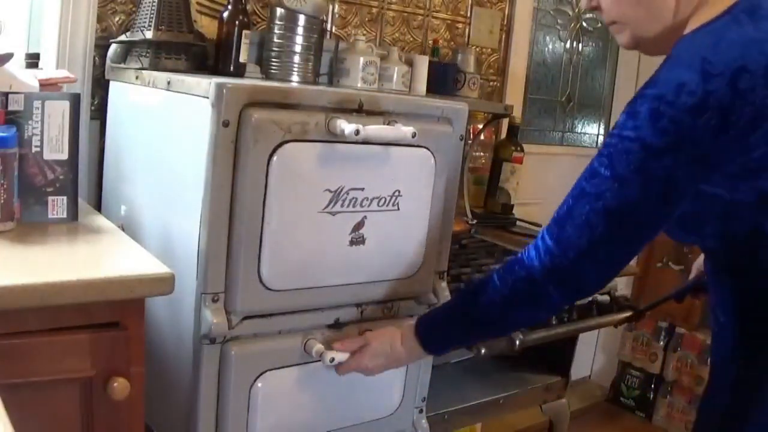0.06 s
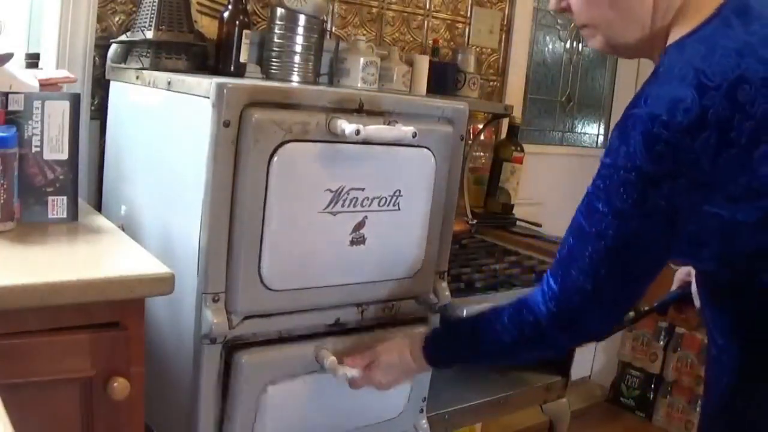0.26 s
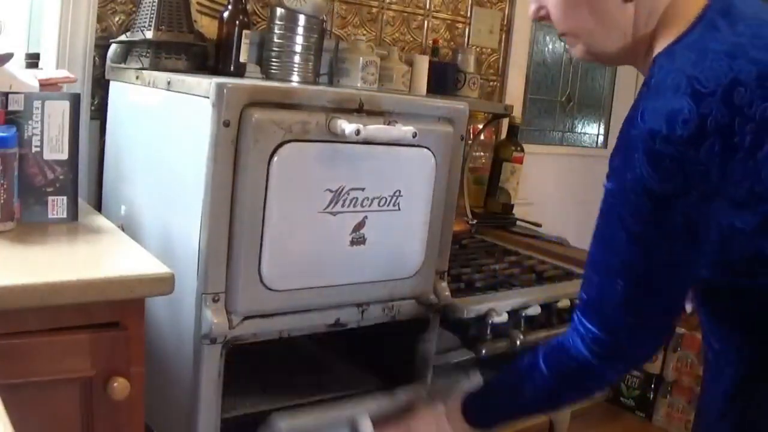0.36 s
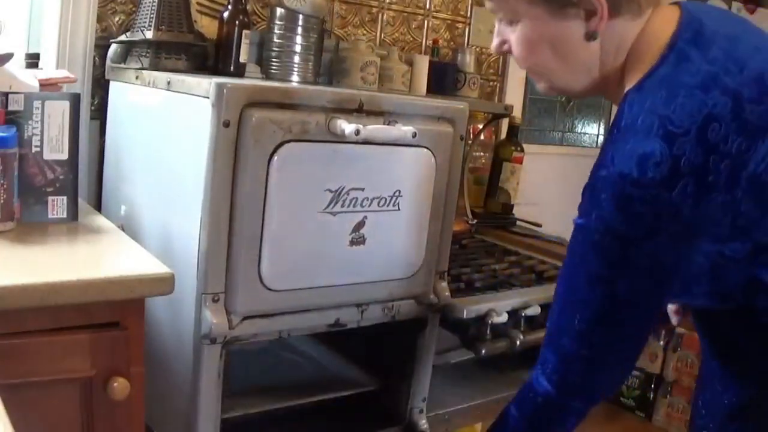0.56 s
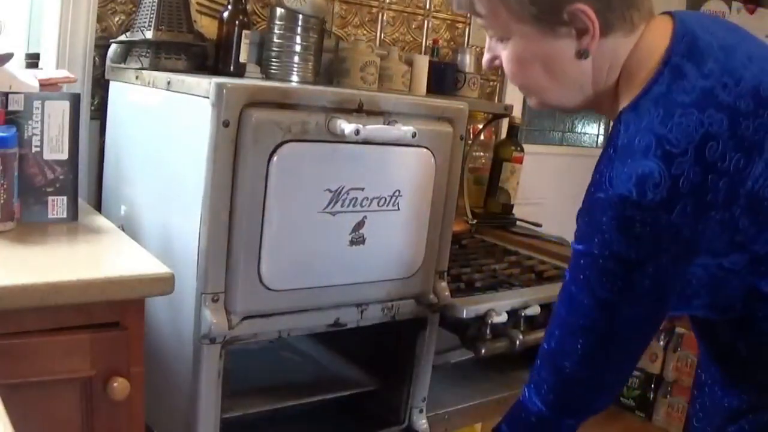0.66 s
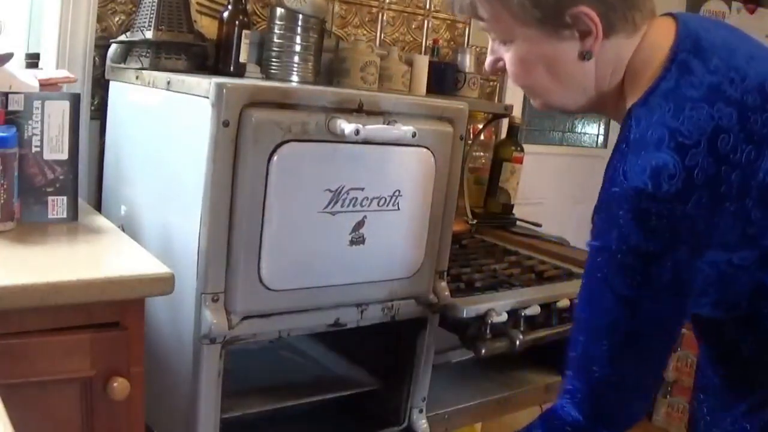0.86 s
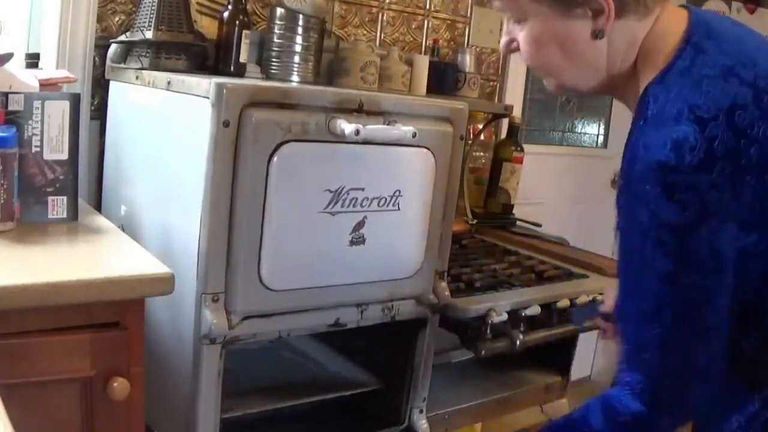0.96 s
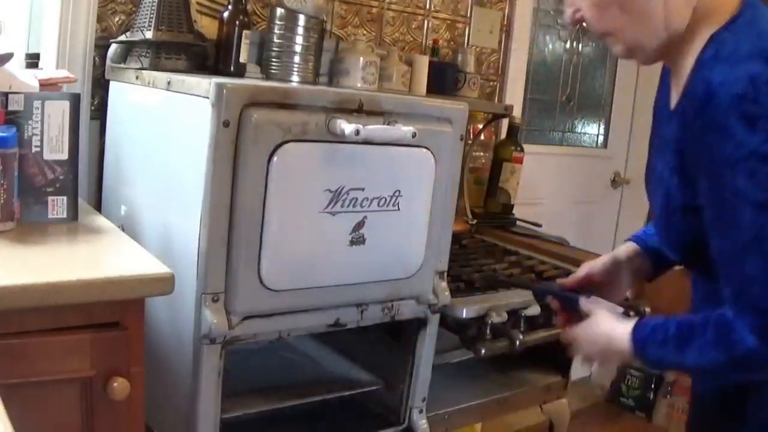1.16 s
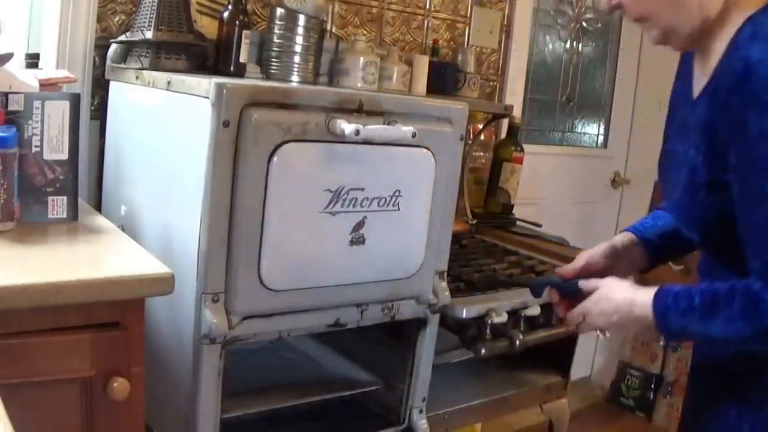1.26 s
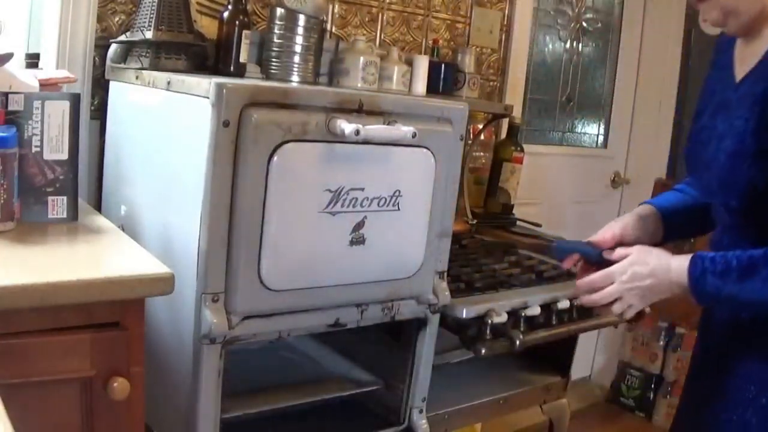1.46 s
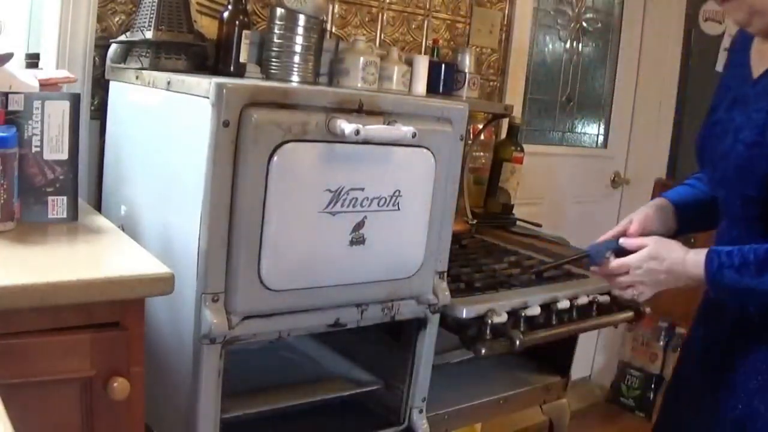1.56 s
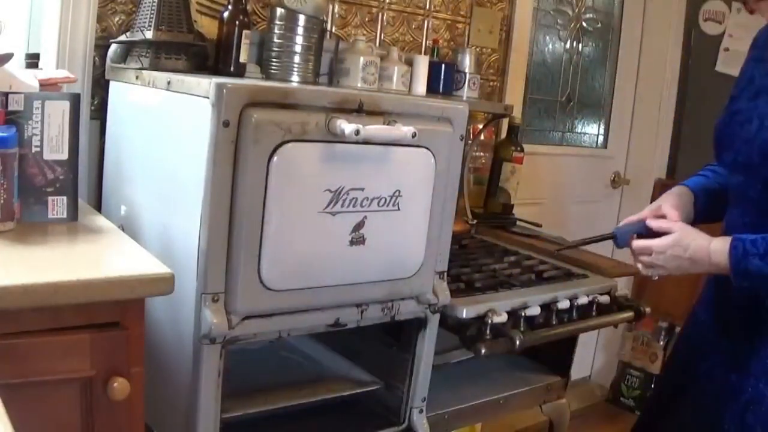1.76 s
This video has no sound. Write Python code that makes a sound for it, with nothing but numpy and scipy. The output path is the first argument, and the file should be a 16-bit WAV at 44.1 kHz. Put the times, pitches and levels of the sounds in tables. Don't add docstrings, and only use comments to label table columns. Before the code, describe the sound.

A heavy metal oven door snaps open with a scraping clatter, then a loose tray rattles

```python
import sys
import numpy as np
from scipy import signal
from scipy.fft import rfft, irfft, next_fast_len
from scipy.io import wavfile
from scipy.ndimage import uniform_filter1d, map_coordinates

SR = 44100
rng = np.random.default_rng(int(sys.argv[2]) if len(sys.argv) > 2 else 0)


def attenuation_scalar(level_db):
    decades = np.asarray(level_db, float) / 20
    return 10 ** decades


def transcribe(signal):
    frames = np.atleast_2d(signal).T
    limited = np.clip(frames, -1, 1)
    pcm = np.round(limited * 32767).astype(np.int16)
    wavfile.write(sys.argv[1], SR, pcm)


N = 79380

# freq_hz, density_db_per_hz
FLOOR_SPECTRUM = [(15, -28), (25, 1.5), (64, 0.5), (572, -11.5), (649, -9), (719, -12), (1470, -16.5),
                  (3950, -20), (10900, -21.5), (14200, -67), (22000, -120)]
FLOOR_DB = -57
HUM_HZ, HUM_DB = 48.8, -59

# start_s, peak_db, t60_s, box_boom_db
BUMPS = [(.085, -54.5, 4.7, -9), (.207, -30, 0.19, -5.5), (0.272, -39, 1.7, -2.5), (0.418, -38, 0.7, -9.5),
         (0.604, -33.5, 0.2, -14), (.657, -46, 0.059, -17), (0.71, -48.5, 0.17, 8), (.852, -45, 0.34, -15),
         (0.888, -29, 0.22, -7), (0.946, -29.5, 0.22, -7), (1.038, -35.5, 0.52, -1),
         (1.199, -45.5, 0.84, -2)]
# freq_hz, width_hz, level_db
PANEL_MODES = [(274, 41, -4), (326, 47.6, 1), (397, 93, -1.5), (448, 92, -2.5), (723, 280, -12)]
# freq_hz, width_hz, level_db
BOX_MODES = [
    (101.7, 14, 0.5),
    (140.7, 32, -1.5),
    (199.5, 33, -8.5),
]
# centre_s, level_db
SWAYS = [
    (.95, -36),
    (1.08, -48),
    (1.25, -49),
]
SWAY_S, SWAY_HZ = 0.031, 29.74

# start_s, peak_db, t60_s, tilt_db_per_octave, rise_ms
TICKS = [(0.1027, -40.5, 0.43, -3.5, 1.7), (0.187, -41, 0.073, 0, 0.43), (0.2052, -7.5, 0.0072, 1.5, 0.13),
         (0.2056, -20.5, 0.13, 1, .3), (.2352, -19, .006, 1, .1), (.2403, -19, 0.0066, 4, .1),
         (.2585, -19, 0.0036, 4, 0.084), (.278, -12, 0.0044, -4, .1), (0.2846, -16, .004, 8, .1),
         (.298, -11, 0.0044, 4, .1), (.3145, -7, 0.0047, -1, .1), (0.2523, -23, 0.29, 5.5, 2),
         (0.499, -42, 3, -7.5, 16.6), (.603, -39.5, 0.3, -10, 18), (.645, -53.5, 0.25, -16.5, 3),
         (0.7114, -35, 0.31, -7, 3), (.75, -47.5, 0.35, -10.5, 2.4), (0.8681, -28, 0.11, -9.5, 1.2),
         (0.8854, -25.5, 0.017, 4, .2), (0.8858, -23.5, 0.1, -10, 0.9), (.955, -27, 0.16, -5, 2.6),
         (1.018, -19.5, 0.13, -3, 5.6), (1.101, -15, 0.16, -2.5, 6.5), (1.13, -26, 0.21, -7, 6.2),
         (1.168, -22.5, 0.16, -0.5, 6.5), (1.208, -19.5, 0.19, -2, 9.8), (1.298, -28, 0.085, 1.5, 3.3),
         (1.372, -30.5, 0.089, 2, 3.84), (1.638, -29, 0.25, -4.5, 5)]

# time_s, force_db
CATCH_FORCE = [
    (.2045, -62),
    (.206, -17.5),
    (.222, -24),
    (.244, -25.5),
    (.256, -20),
    (.275, -24),
    (.31, -53),
]
# freq_hz, width_hz, level_db
CATCH_MODES = [(353, 30, -2.5), (1200, 52, -1.5), (1440, 200, -10.5), (1824, 59, 1.5), (2050, 100, -4.5),
               (2236, 43, 2), (2380, 39.3, -16), (3130, 99, -2.5), (6360, 270, -6)]
# freq_hz, density_db_per_hz
CATCH_GRIT = [(41, -52), (70, -49), (342, -33), (1070, -21.5), (1810, 3.5), (2600, -10), (4600, -18),
              (6450, -27), (10900, -27), (14200, -61), (22000, -120)]
# time_s, force_db
HINGE_FORCE = [
    (.25, -60),
    (.254, -33.5),
    (.285, -18),
    (.335, -20),
    (.36, -24.5),
    (.4, -31),
    (.52, -53.5),
]
# freq_hz, width_hz, level_db
DOOR_MODES = [(270, 45, 0), (720, 160, -3.5), (1400, 210, -8), (2006, 235, 6), (2184, 91, 2.5),
              (2680, 94, 7), (2970, 120, 0.5), (3620, 42, 9.5), (6040, 233, -3.5), (6790, 250, 3.5),
              (9760, 410, -11), (10100, 750, -17)]
# freq_hz, density_db_per_hz
HINGE_GRIT = [(41, -52), (70, -36), (177, -34), (271, -12), (556, -17.5), (716, -7.5), (1120, -16.5),
              (2150, -10.5), (10900, -26.5), (14200, -53.5), (22000, -120)]

# start_s, length_s, pitch_hz, level_db
SQUEAKS = [(0.21, 0.016, 1815, -17.5), (.2055, 0.019, 6900, -29), (0.22, 0.016, 2060, -31),
           (.242, 0.013, 1850, -24), (.26, .016, 1745, -23), (.292, .012, 1000, -25),
           (0.274, .03, 2000, -27), (0.25, 0.061, 6900, -27), (.212, 0.028, 340, -30),
           (0.265, 0.05, 276, -26.5), (0.26, 0.017, 600, -29), (0.33, 0.032, 2670, -22.5),
           (0.34, 0.03, 2110, -24.5), (0.321, 0.042, 728, -22.5), (0.33, 0.013, 820, -32),
           (0.7, 0.08, 337.1, -44), (.85, .026, 395, -37), (0.886, 0.012, 599.2, -30),
           (1, 0.011, 1470, -26), (0.892, 0.0089, 345, -23), (.911, 0.016, 385, -24),
           (.946, 0.0039, 400, -20), (.956, 0.018, 365, -26), (.9145, 0.013, 8560, -23.5),
           (.929, 0.0092, 9300, -27.5), (0.87, 0.012, 5710, -43), (0.97, 0.018, 8610, -35),
           (1.08, 0.056, 6770, -32.5), (1.35, 0.0093, 9200, -34), (1.23, 0.0093, 7600, -33),
           (1.4, .01, 10100, -40.5), (1.44, 0.016, 7200, -42)]
SQUEAK_WET = 0.45

# time_s, force_db, weight_db, edge_contact_db
DRAG = [(.885, -43, 1, 4), (.892, -29.5, 0.5, -2), (.94, -38.5, 7, 0.5), (.97, -30, 0.5, -2.5),
        (1.014, -30.5, -1.5, -3), (1.05, -33.5, 1, -1.5), (1.1, -28.5, -2.5, -5.5), (1.16, -29, -2.5, -1.5),
        (1.198, -31, -0.5, -1), (1.242, -28, 0, -5.5), (1.29, -33.5, -2.5, -2), (1.35, -37, 3.5, -4.5),
        (1.41, -35, 2, -8), (1.46, -34.5, -3, -4), (1.55, -36.5, 1, -7), (1.625, -40.5, 2.5, -9),
        (1.7, -38.5, 3.5, -9), (1.8, -41.5, 0.5, -6.5)]
# freq_hz, width_hz, level_db
TRAY_MODES = [(368, 78, 6), (714, 27, 1), (840, 24.5, -11), (1027, 21, -13), (1720, 480, 1),
              (2705, 220, 13.5), (3080, 480, -5), (5840, 90, -29), (6700, 170, -20), (8510, 84, 1),
              (9890, 120, -3)]
# freq_hz, density_db_per_hz
TRAY_GRIT = [(110, -27), (180, -11.5), (845, 2), (1460, -6), (2720, -4), (7120, -14), (8750, -9),
             (10900, -20), (14200, -70), (22000, -120)]
# freq_hz, share
TRAY_SPLITS = [
    [(900, 1), (1600, 0.089)],
    [(4500, 0.039), (6500, 0.93)],
]

# freq_hz, t60_s
KITCHEN_T60 = [(100, 0.39), (500, 0.64), (2500, 0.46), (9000, 0.18)]
KITCHEN_DB = -4.5

CEILING, TOP_HZ = 0.62, 11100


def unit(x):
    return x / np.sqrt(np.mean(x ** 2) + 1e-20)


def along(points, hz):
    f, v = np.transpose(points)
    return np.interp(np.log(hz + 1), np.log(f + 1), v)


def curves(rows):
    s, *cols = np.transpose(rows)
    return [np.interp(np.arange(N) / SR, s, c, left=-120) for c in cols]


def wobble(rate_hz):
    knots = rng.standard_normal(int(N * rate_hz / SR) + 4)
    return map_coordinates(knots, [np.arange(N) * rate_hz / SR])


def filtered(x, response):
    m = next_fast_len(N + SR // 2)
    return irfft(rfft(x, m) * response(np.fft.rfftfreq(m, 1 / SR)), m)[..., :N]


def modes(body):
    def response(f):
        total = 0
        for k, (hz, width_hz, db) in enumerate(body):
            damping = 1j * f * width_hz
            total = total + (-1) ** k * attenuation_scalar(db) * damping / (hz * hz - f * f + damping)
        return total
    return response


def grit(spectrum, excite):
    return unit(filtered(excite, lambda f: attenuation_scalar(along(spectrum, f))))


def slips(rate_hz, spread_db, lumpy_db):
    hit = rng.random(N) < rate_hz / SR
    size = attenuation_scalar(spread_db * rng.exponential(size=N)) * rng.standard_normal(N)
    return unit(hit * size * attenuation_scalar(lumpy_db * wobble(90)))


def rub(force_db, body, spectrum, ring_db, excite):
    response = modes(body)
    ring = filtered(attenuation_scalar(force_db) * excite, response) / np.std(filtered(excite, response))
    return attenuation_scalar(force_db) * grit(spectrum, excite) + attenuation_scalar(ring_db) * ring


def stroke(points):
    return np.where(np.arange(N) > points[-1][0] * SR, -120, curves(points)[0])


def floor():
    mid, side = (grit(FLOOR_SPECTRUM, rng.standard_normal(N)) for _ in range(2))
    side = filtered(side, lambda f: 0.5 * f / (f + 150))
    hum = attenuation_scalar(HUM_DB + wobble(8.3)) * np.sin(2 * np.pi * HUM_HZ * np.arange(N) / SR)
    return attenuation_scalar(FLOOR_DB) * np.array([mid + side, mid - side]) + hum


def sways():
    t = np.arange(N) / SR
    push = sum(attenuation_scalar(db) * np.exp(-((t - s) / SWAY_S) ** 2) for s, db in SWAYS)
    pitch_hz = SWAY_HZ * (1 + 0.16 * wobble(11.6))
    return push * np.sin(2 * np.pi * np.cumsum(pitch_hz) / SR)


def bumps():
    t = np.arange(N) / SR
    force = []
    for s, db, t60_s, _ in BUMPS:
        decay = attenuation_scalar(db - 60 * np.clip(t - s, 0, None) / t60_s)
        force.append(decay * np.clip((t - s) / 0.0049, 0, 1))
    force = np.array(force)
    boom = attenuation_scalar(np.transpose(BUMPS)[-1])
    out = 0
    for body, share in (PANEL_MODES, np.ones(len(BUMPS))), (BOX_MODES, boom):
        noise = rng.standard_normal(N)
        steep = lambda f: modes(body)(f) / (1 + 1j * f / (4.0 * body[0][0])) ** 2
        out = out + filtered(share @ force * noise, steep) / np.std(filtered(noise, steep))
    return out


def ticks():
    out, t = np.zeros(N + SR), np.arange(SR // 2) / SR
    f = np.fft.rfftfreq(len(t), 1 / SR)
    highpass = 1j * f / (900 + 1j * f)
    for s, db, t60_s, tilt_db, rise_ms in TICKS:
        rise = np.minimum(t * 1000 / rise_ms, 1)
        burst = attenuation_scalar(db - 60 * t / t60_s) * rise * rng.standard_normal(len(t))
        tilt = attenuation_scalar(tilt_db * np.log2(f / 4000 + 0.18))
        out[round(s * SR):][:len(t)] += irfft(rfft(burst) * tilt * highpass, len(t))
    return out[:N]


def catch():
    return rub(stroke(CATCH_FORCE), CATCH_MODES, CATCH_GRIT, -0.7, slips(15000, 0.43, 1.65))


def hinge():
    return rub(stroke(HINGE_FORCE), DOOR_MODES, HINGE_GRIT, -1.3, slips(15000, 2.0, 0.89))


def squeaks():
    t, out = np.arange(N) / SR, 0
    for s, length_s, hz, db in SQUEAKS:
        u = np.clip((t - s) / length_s, 0, None)
        rough_hz = 620 * hz / 8000
        flutter = attenuation_scalar(1.5 * wobble(rough_hz / 2)) * np.exp(1j * wobble(rough_hz))
        swell = 2 * np.sqrt(u) * np.exp(-u ** 3)
        out = out + attenuation_scalar(db) * swell * np.real(flutter * np.exp(2j * np.pi * hz * t))
    return out


def patchy(x, depth_db):
    z = signal.stft(x, nperseg=512)[2]
    field = uniform_filter1d(rng.standard_normal(z.shape), size=4, axis=0)
    field = uniform_filter1d(field, size=8, axis=1)
    return signal.istft(z * attenuation_scalar(depth_db * unit(field)), nperseg=512)[1][:N]


def tray():
    force_db, weight_db, edge_db = curves(DRAG)
    excite = slips(16000, 0.85, 1.0)
    rattle = patchy(rub(np.zeros(N), TRAY_MODES, TRAY_GRIT, -5, excite), 1.3)
    low, high = (filtered(rattle, lambda f: np.clip(along(p, f), 0, 1)) for p in TRAY_SPLITS)
    parts = unit(rattle - low - high)
    parts = parts + attenuation_scalar(weight_db + wobble(25.62)) * unit(low)
    parts = parts + attenuation_scalar(edge_db + 1.2 * wobble(30.36)) * unit(high)
    return attenuation_scalar(force_db - 2.0 + 0.42 * wobble(22.13)) * parts


def kitchen(x, count=5):
    hz, t, z = signal.stft(rng.standard_normal((count, 2, SR // 2)), SR, nperseg=256)
    decay = attenuation_scalar(-60 * t / along(KITCHEN_T60, hz)[:, None])
    tail = signal.istft(z * decay, SR, nperseg=256)[1]
    tail = tail * np.sqrt(count) / np.linalg.norm(tail[:, 0])
    turn = (np.arange(N) / SR / 0.025 - np.arange(count)[:, None]) % count
    shares = x * np.clip(1 - np.abs(turn - 1), 0, 1)
    shares = np.pad(shares, ((0, 0), (200, 0)))
    mid, side = signal.fftconvolve(shares[:, None], tail, axes=2)[..., :N].sum(0)
    side = filtered(side, lambda f: 0.67 * f / (f + 300))
    return np.array([mid + side, mid - side])


def scene():
    sing = squeaks()
    door = catch() + hinge() + bumps() + sways()
    loose = tray() + ticks() + sing
    near = door * attenuation_scalar([[0.6], [-0.6]]) + loose * attenuation_scalar([[0.4], [-0.4]])
    send = near.mean(0) - (1 - SQUEAK_WET) * sing
    return near + attenuation_scalar(KITCHEN_DB) * kitchen(send) + floor()


def band_limit(x):
    return signal.sosfilt(signal.butter(12, 11090, fs=SR, output="sos"), x)


def record(dry):
    held = dry / (1 + np.abs(dry / CEILING) ** 3) ** (1 / 3)
    mix = filtered(held, lambda f: 1 / (1 + (f / TOP_HZ) ** 150) + 0.0015 * (f < 14000))
    return band_limit(mix)


dry = scene()
out = record(dry)
transcribe(out)
```